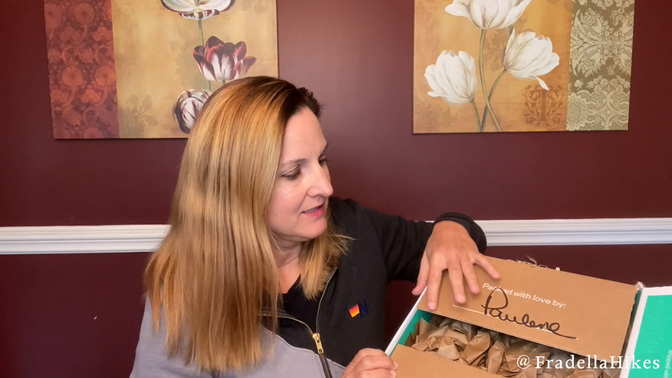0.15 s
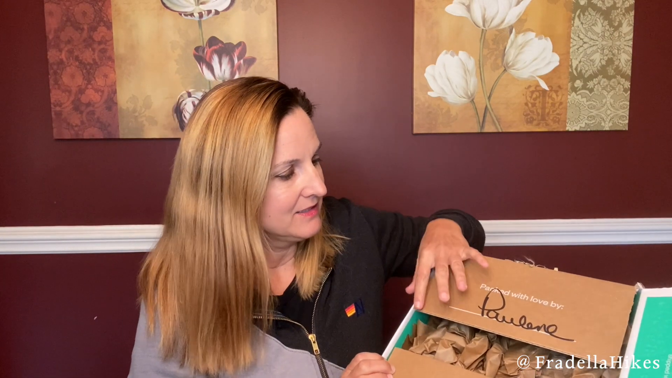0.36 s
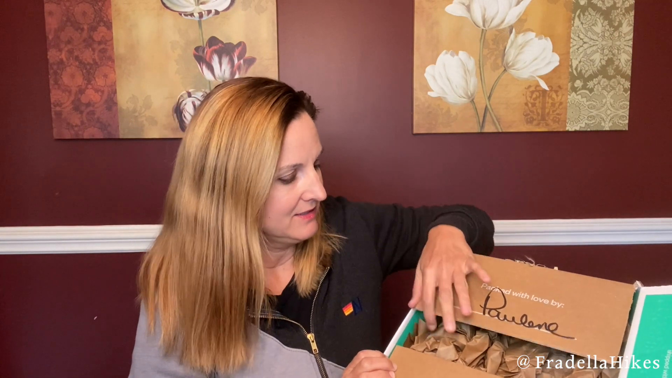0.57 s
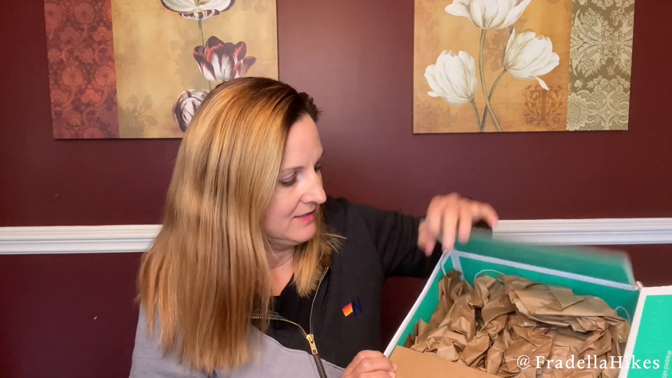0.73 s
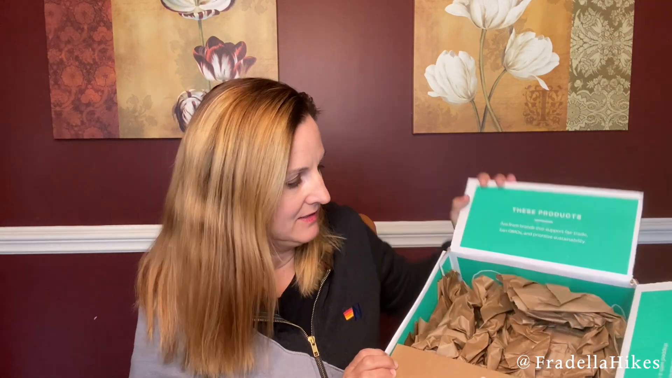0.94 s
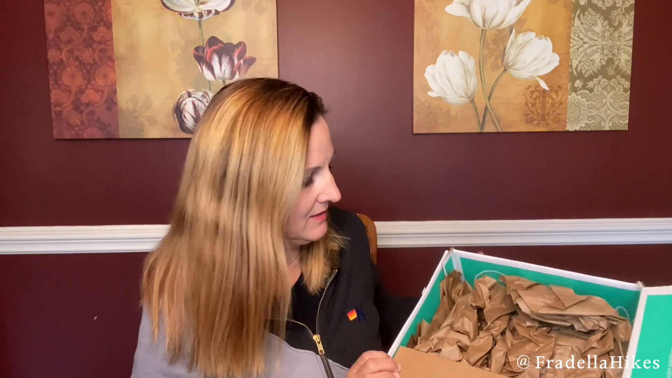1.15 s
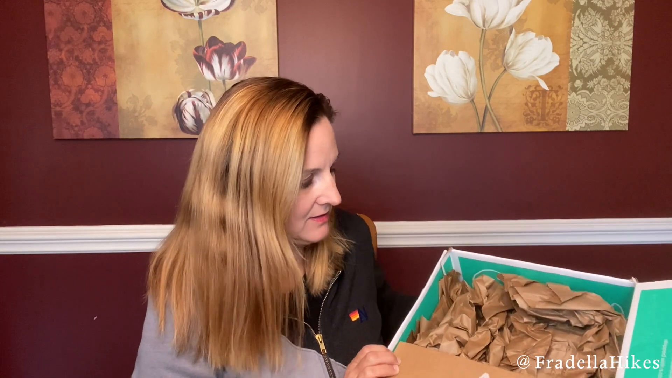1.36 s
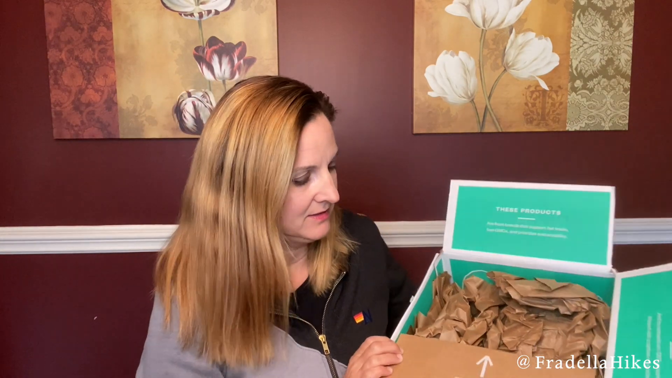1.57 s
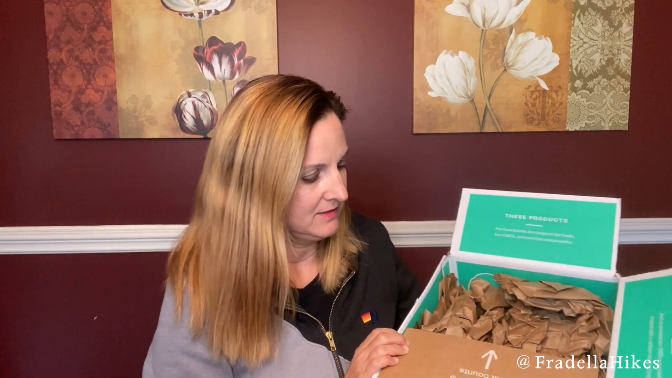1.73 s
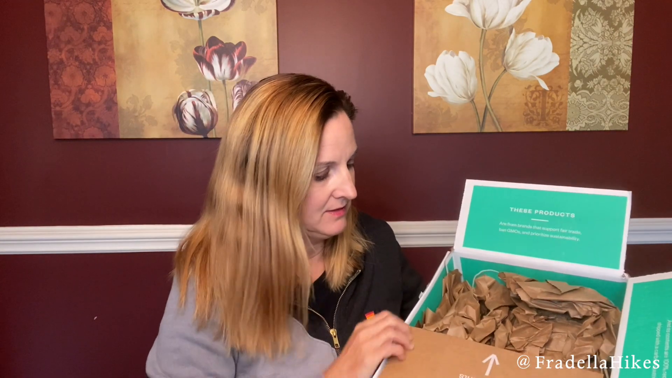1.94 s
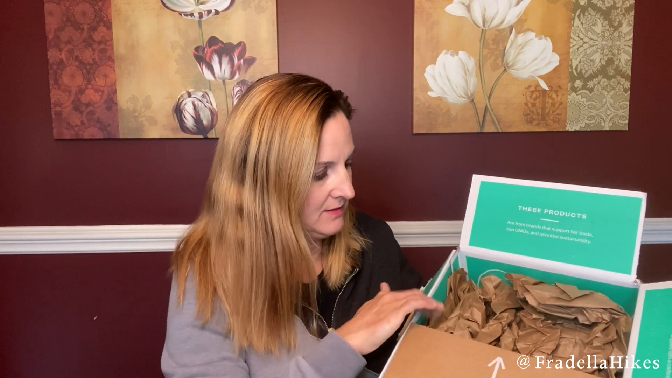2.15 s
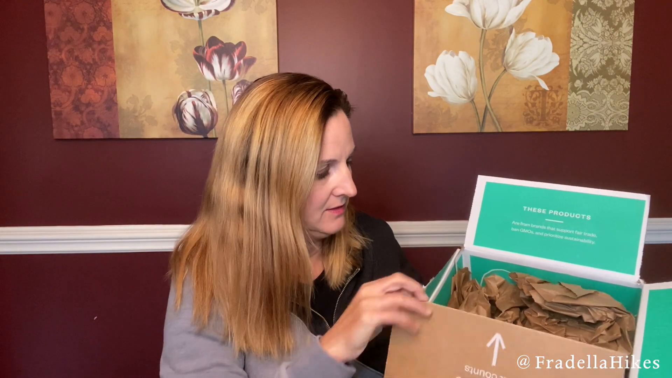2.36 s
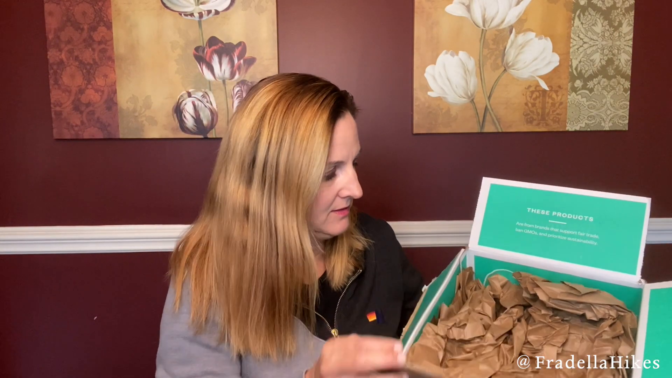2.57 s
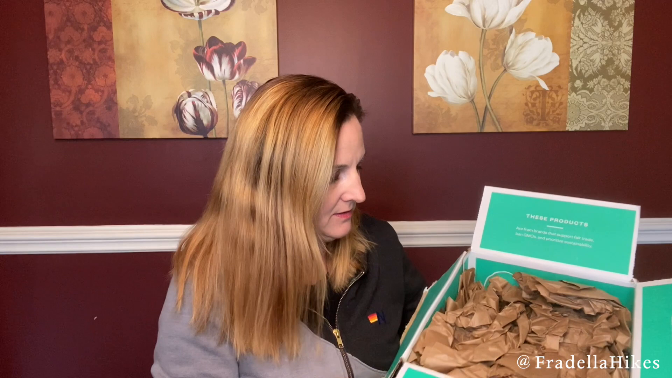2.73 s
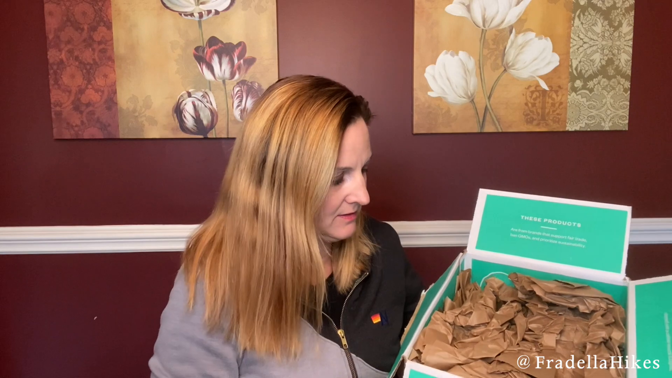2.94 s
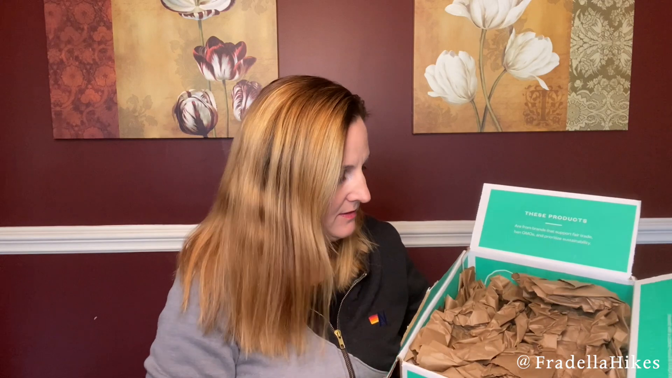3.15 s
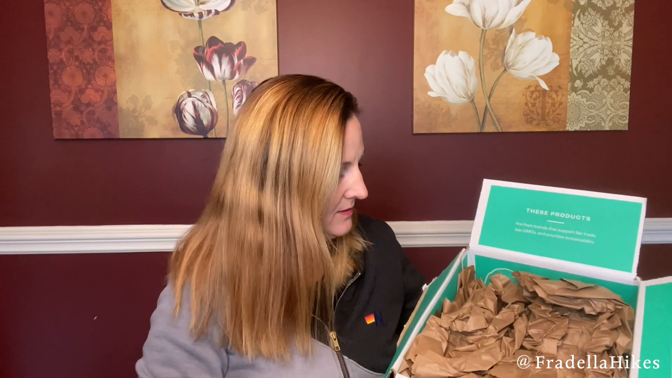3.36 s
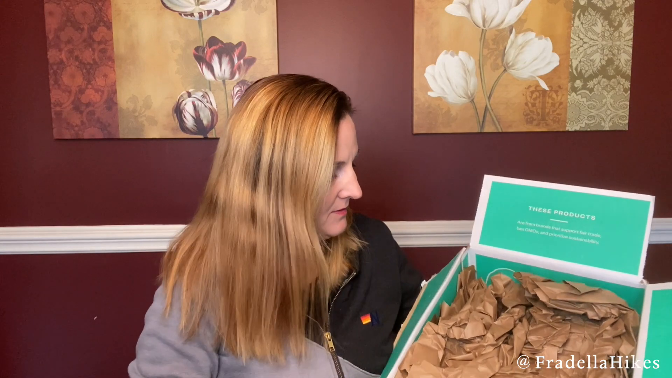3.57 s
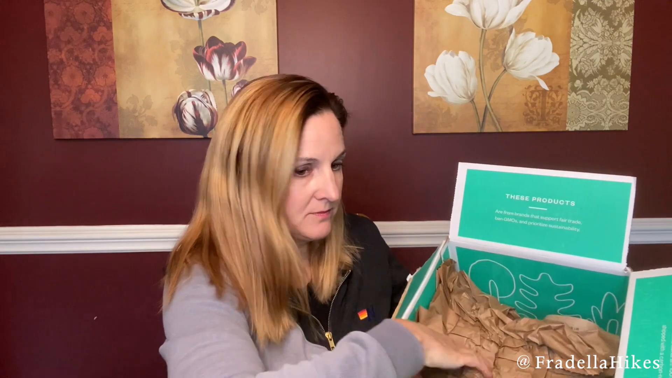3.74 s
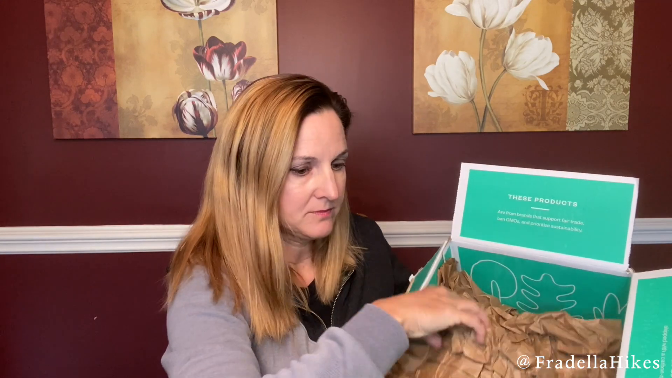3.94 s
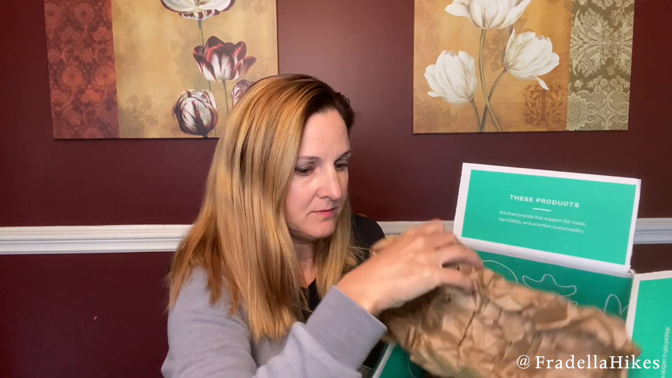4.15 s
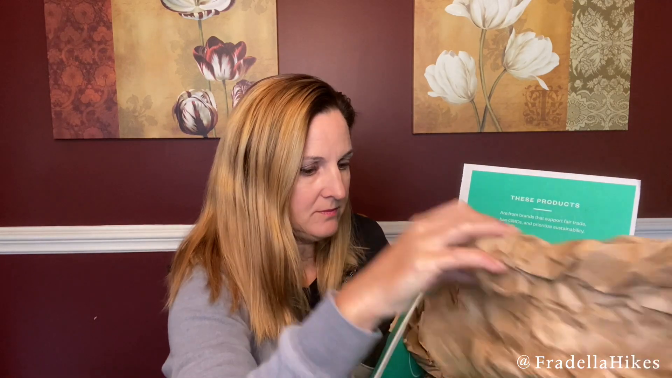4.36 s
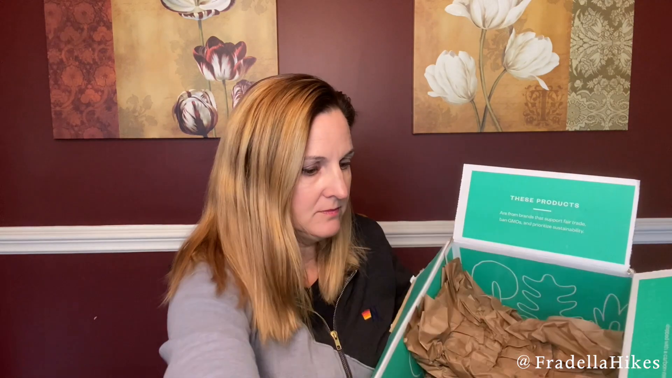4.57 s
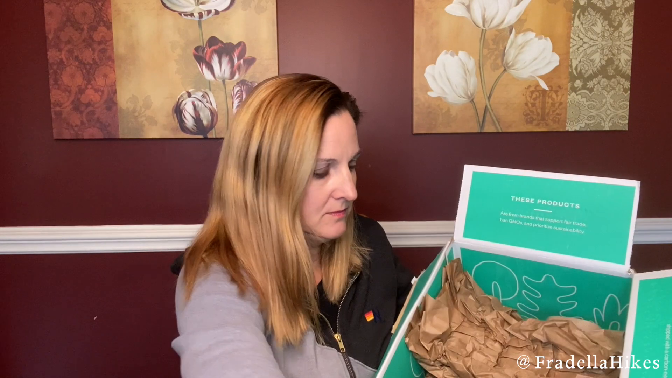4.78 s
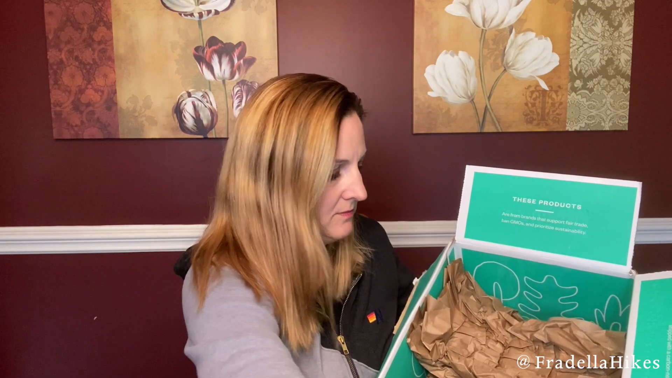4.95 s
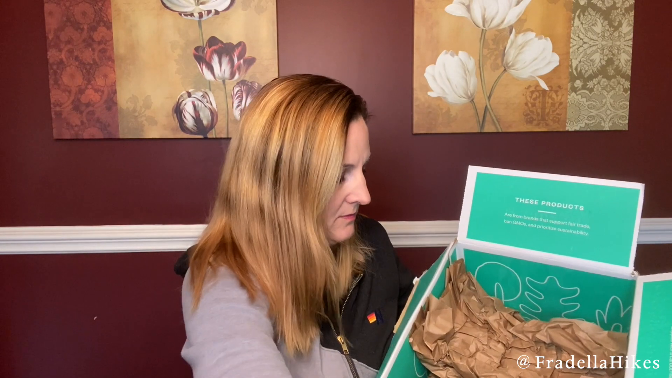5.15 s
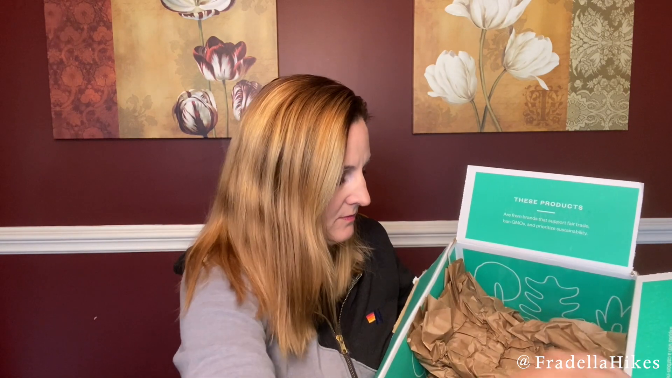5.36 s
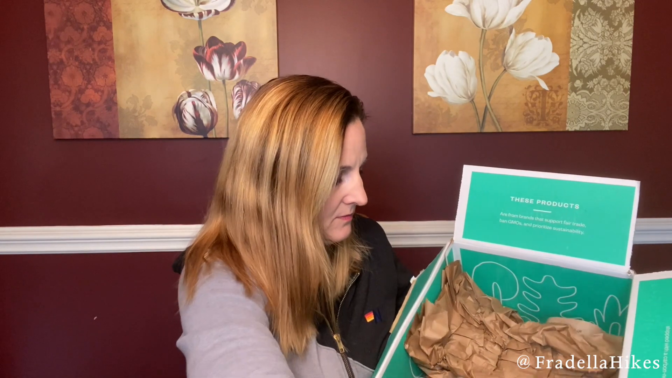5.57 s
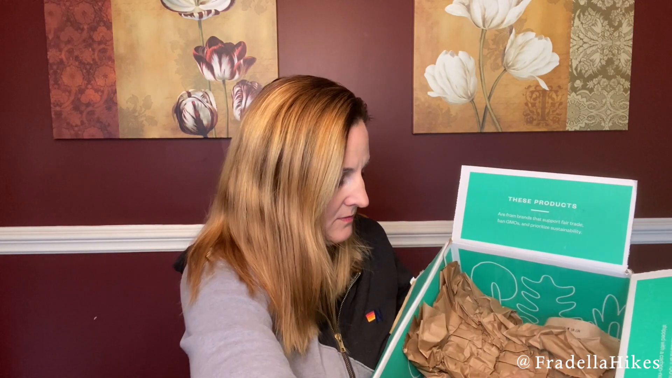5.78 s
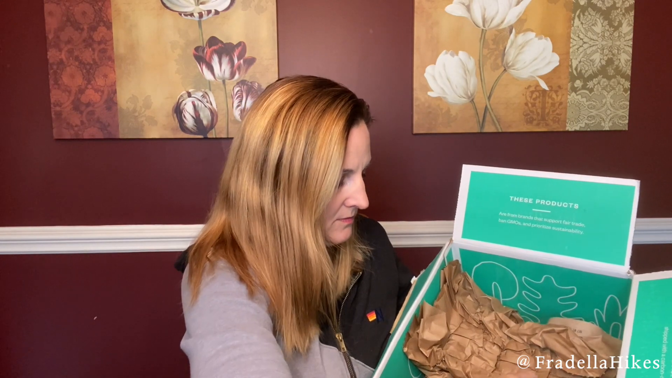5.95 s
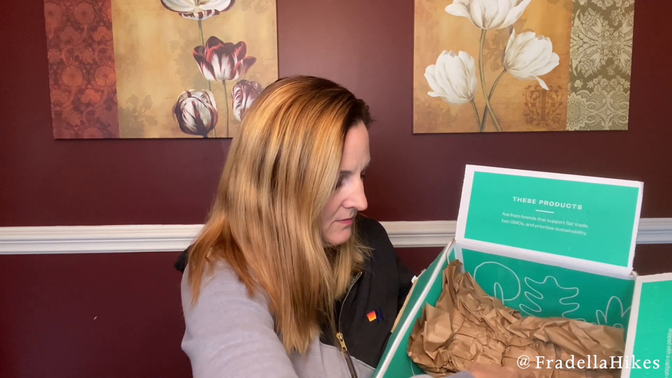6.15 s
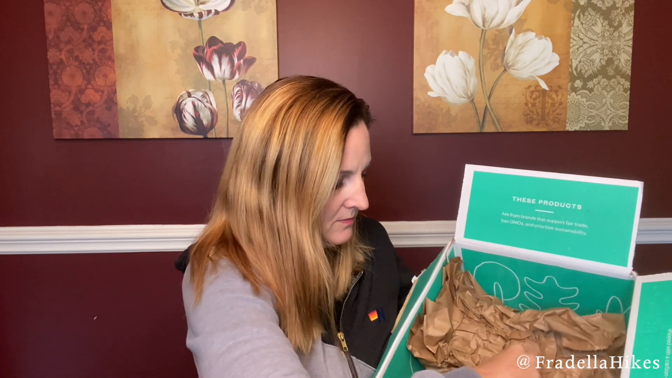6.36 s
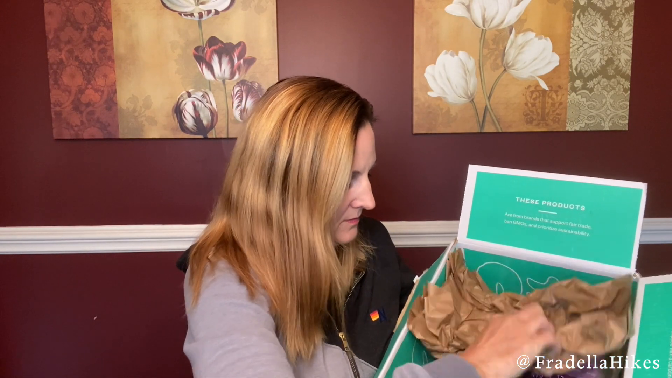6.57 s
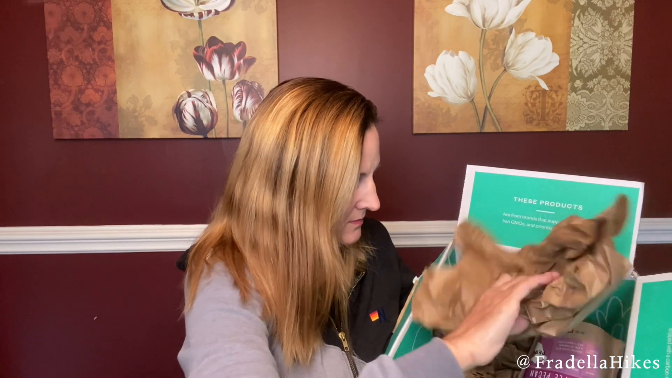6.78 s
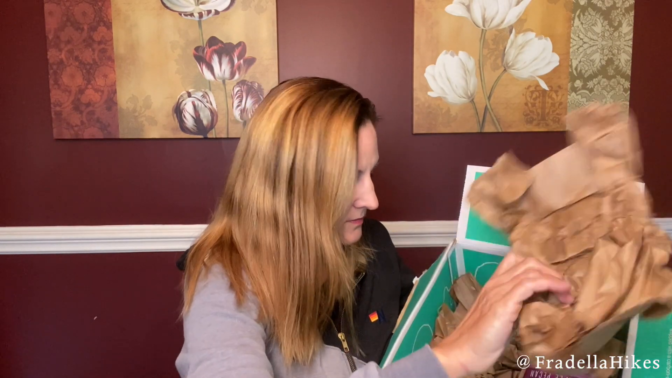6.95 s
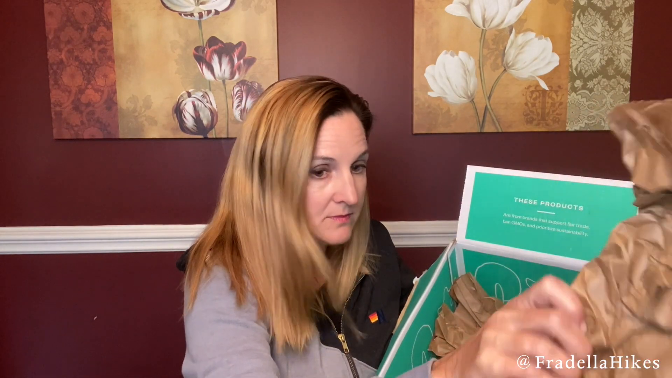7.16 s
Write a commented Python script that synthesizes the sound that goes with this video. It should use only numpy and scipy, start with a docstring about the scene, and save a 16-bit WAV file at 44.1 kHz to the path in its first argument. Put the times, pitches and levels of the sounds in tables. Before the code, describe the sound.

A cardboard box is opened with sharp knocks, flap scrapes and soft thuds, then crumpled packing paper crackles and rustles loudly in a small room.

```python
"""Small room, close mono microphone: a cardboard box is opened; flaps snap, knock and scrape, a sleeve slides.
Packing paper is then gripped, lifted out and dropped, and a second wad is worked loose.
Blows are air pushes, wall modes and board cracks; slides are random slips through resonances and spectra.
Paper is a swarm of ringing clicks with single loud snaps; low noise follows the movements.
A reverberant tail and quiet air noise complete the scene."""
import sys
import numpy as np
from scipy import signal
from scipy.fft import rfft, irfft
from scipy.io import wavfile
from scipy.ndimage import uniform_filter1d

SR = 44100
rng = np.random.default_rng(int(sys.argv[2]) if len(sys.argv) > 2 else 0)


def generate_wav(sig):
    """Save sig (samples, or channels by samples) to the path in sys.argv[1] as 16-bit PCM at SR."""
    pcm = np.round(np.clip(np.atleast_2d(sig).T, -1, 1) * 32767).astype(np.int16)
    wavfile.write(sys.argv[1], SR, pcm)


N = 318038
TIME_S = np.arange(N) / SR

# Blows on the box. Each row: start in seconds, air push in dB, wall ring in dB, crack in dB,
# crack decay in seconds, hardness as a tilt in dB per octave.
BLOWS = [(0.022, -58, -58, -48.5, 0.0043, -8), (0.04, -56, -50, -43.5, 0.0046, -7.5),
         (0.141, -39, -32, -31, 0.0011, 2.5), (0.1598, -55, -24.5, -11, 0.0021, -2),
         (0.84, -42, -40.5, -39.5, .006, 10), (1.144, -23.5, -31.5, -38, 0.0078, -7),
         (1.401, -31, -34, -34, 0.016, -4.5), (1.6012, -40, -13.5, -24, 0.02, -10.5),
         (1.692, -31, -25.5, -40, 0.0044, -9), (1.949, -57, -48, -35, 0.011, -0.5),
         (1.971, -48, -26.5, -29, 0.0076, 3), (1.986, -54, -25.5, -25, 0.004, 0),
         (2.113, -32.5, -45, -51, .004, 2), (2.208, -32, -38, -33, 0.0074, 1.5),
         (2.271, -34, -30.5, -27, .007, 3.5), (2.397, -31.5, -37, -37, 0.0025, -9.5),
         (2.779, -26.5, -31.5, -26.5, 0.0068, 4.5), (3.125, -26, -26, -28.5, 0.034, 0.5),
         (3.4523, -45, -37, -32.5, 0.015, 3), (3.871, -47, -23.5, -41, 0.0054, -3.5),
         (4.064, -21.5, -23, -48, .005, -15), (6.651, -45, -25, -29, 0.01, -3)]
# Modes of the box walls. Each row: nominal frequency in Hz, relative level in dB, t60 in seconds.
WALL_MODES = [(154.4, -3.5, 0.057), (226.6, -6.5, 0.13), (315.3, -1, 0.082), (372.5, 7, 0.059),
              (398, -1, 0.039), (606, -10, 0.15), (1220, -15.5, 0.16)]
# Resonances of the stiff board. Each row: frequency in Hz, width in Hz, relative level in dB.
BOARD_MODES = [(567, 910, 4), (830, 130, -9), (1560, 460, 3), (2900, 110, -23.5), (3800, 2740, 4.5),
               (5060, 120, 1.5), (5870, 920, -4.5), (8600, 670, 0.5), (11700, 4400, -5)]
# Strokes of hand or sleeve on the flaps. Each row: start in seconds, length in seconds, rise in seconds,
# board rub in dB, cloth hiss in dB, pushed air in dB.
STROKES = [(0.101, 0.11, 0.024, -55, -57.5, -62), (0.332, 0.087, 0.066, -64, -68.5, -68),
           (0.533, 0.053, 0.031, -56.5, -61, -46.5), (0.631, 0.016, 0.015, -55.5, -59.5, -50),
           (0.702, 0.1, 0.013, -61.5, -60.5, -61), (0.78, 0.12, 0.044, -54.5, -59.5, -53),
           (0.906, 0.29, 0.065, -51.5, -56, -57), (1.224, 0.16, 0.021, -66, -71, -55),
           (1.391, 0.026, 0.015, -48, -57.5, -52), (1.465, 0.22, 0.059, -61.5, -64, -68),
           (1.698, .11, 0.015, -53, -62.5, -60), (1.796, 0.24, 0.047, -54, -57.5, -70),
           (2.075, 0.083, 0.026, -58.5, -66, -54), (2.187, 0.071, 0.086, -42, -43, -52),
           (2.395, 0.089, 0.051, -51, -57, -51), (2.541, 0.093, .03, -57, -60.5, -58),
           (2.654, 0.18, 0.049, -47.5, -52, -50), (2.866, 0.23, 0.1, -53, -54.5, -56),
           (3.095, 0.029, 0.04, -37.5, -50, -47), (3.252, .14, 0.05, -53, -60.5, -63),
           (3.48, 0.14, 0.023, -58.5, -58.5, -70), (3.632, 0.096, .01, -61.5, -74, -64)]
# Front flap dragging as it is folded down. Each row: time in seconds, resonance in Hz, level in dB.
FLAP_DRAG = [(2.41, 1500, -90), (2.46, 1540, -58), (2.6, 1170, -109), (2.745, 950, -50), (2.87, 1030, -67),
             (2.98, 1100, -64), (3.2, 940, -73), (3.5, 1010, -82)]
# Squeezes, pulls and falls of the paper. Each row: start in seconds, length in seconds, rise in seconds,
# level in dB, extra treble in dB, pushed air in dB.
SQUEEZES = [(3.771, 0.17, 0.016, -34, -2, -45.5), (3.918, 0.07, 0.014, -33.5, 0.5, -48),
            (4.003, 0.068, 0.034, -30, -1, -46), (4.127, 0.066, 0.04, -44.5, 4, -64),
            (4.332, 0.21, 0.017, -56, -3, -59), (4.533, 0.11, 0.029, -46.5, -8, -52),
            (4.644, 0.078, 0.0097, -37.5, -3.5, -42), (4.769, 0.23, 0.021, -35.5, -4.5, -40),
            (5.053, 0.11, 0.042, -43.5, -3.5, -46), (5.498, 0.023, 0.0035, -42, 1.5, -56),
            (5.539, 0.035, 0.031, -36, 2.5, -46), (5.64, .06, 0.035, -45, -5, -60),
            (5.694, 0.12, .02, -38, -3, -53), (5.837, 0.061, .015, -43, -0.5, -48),
            (5.91, 0.097, 0.016, -46.5, -1.5, -60), (6.007, 0.048, 0.015, -38.5, -4, -63),
            (6.082, 0.12, 0.064, -38, 1, -55), (6.261, 0.098, .045, -36.5, -1, -53),
            (6.392, 0.098, 0.054, -35, 2.5, -48), (6.511, 0.066, 0.031, -39.5, 3.5, -55),
            (6.638, 0.075, 0.006, -37, 2.5, -48), (6.778, 0.14, 0.0087, -49, -1, -66),
            (6.907, 0.07, .025, -43.5, -6, -51.5), (6.975, 0.081, .01, -48.5, -4.5, -69),
            (7.053, 0.031, 0.038, -40, -5.5, -57), (7.186, 0.017, 0.014, -47, -6, -52)]
# Loudest buckling creases. Each row: start in seconds, level in dB, ring centre in Hz, decay in seconds.
CREASES = [(3.7753, -32, 1790, 0.0036), (3.799, -22.5, 2580, 0.0023), (3.824, -18, 4200, 0.0014),
           (3.87, -21, 1580, 0.0026), (3.9363, -21, 4500, 0.0011), (3.9422, -18, 4660, 0.0037),
           (4.012, -13.5, 2100, 0.0015), (4.025, -23, 3800, 0.0017), (4.052, -23, 2680, .004),
           (4.3779, -35.5, 1610, 0.0013), (4.4174, -33.5, 2900, 0.0017), (4.472, -39, 3800, 0.0033),
           (4.53, -39.5, 2470, 0.00068), (4.789, -21, 1730, 0.0026), (5.55, -29.5, 1700, 0.00085),
           (5.699, -24.5, 2340, 0.0016), (5.7433, -26, 3300, 0.00071), (5.754, -25.5, 2380, 0.0032),
           (5.8444, -24, 2480, 0.0079), (5.931, -28, 3930, .0047), (6.023, -28, 1290, 0.0028),
           (6.12, -27, 4100, 0.0057), (6.344, -27, 2440, 0.0013), (6.4385, -22.5, 4400, 0.0027),
           (6.647, -19.5, 2900, 0.0019), (6.7876, -24.5, 2880, 0.0031), (6.8754, -25, 3350, 0.0034),
           (6.9237, -28, 2900, 0.0066), (6.9445, -23.5, 4230, 0.007), (6.98, -25.5, 4600, 0.00022),
           (7.069, -33, 2020, .002), (7.094, -29, 2310, .003)]
# Spectra of paper, board rub, cloth hiss, low flutter and room air.
# Each row: frequency in Hz, relative density in dB per Hz.
PAPER_SPECTRUM = [(60, -14.5), (150, -2.5), (340, -0.5), (550, -3), (1000, -1), (1700, -1), (2500, -3.5),
                  (4800, -5), (6000, -7), (8000, -7.5), (11000, -14), (16000, -20.5)]
RUB_SPECTRUM = [(100, 0.5), (220, -1), (380, 2.5), (600, -3.5), (1200, -6), (3000, -11), (6000, -19.5),
                (16000, -67)]
CLOTH_SPECTRUM = [(500, -17), (2000, -4.5), (4000, 0.5), (8500, 5), (11000, 1.5), (13500, 0.5),
                  (16000, -4.5)]
RUMBLE_SPECTRUM = [(10, -49.5), (28, 5), (52, 7.5), (85, -3), (130, -10.5), (250, -20.5), (600, -63)]
AIR_SPECTRUM = [(15, -8), (55, -36.5), (130, -16), (350, -21), (2200, -34), (4000, -38), (16000, -50)]
# Room decay. Each row: frequency in Hz, t60 in seconds.
ROOM_T60 = [(100, 0.35), (1200, 0.46), (3700, 0.43), (8000, 0.29), (16000, 0.2)]
# Colour of the reflections. Each row: frequency in Hz, relative level in dB.
REFLECTION_COLOUR = [(100, -2), (400, 5.5), (1400, 3.5), (4000, 2.5), (8000, 2.5), (16000, 3.5)]

# Sag: easing during a movement. Stop and settle: dying away after it.
STROKE_SAG_DB_PER_S, STROKE_STOP_DB_PER_S = 8, 175
PAPER_SAG_DB_PER_S, PAPER_SETTLE_DB_PER_S, TREBLE_SETTLE_DB_PER_S = 12.5, 174, 203
FLUTTER_STOP_DB_PER_S, RESTING_RUMBLE_DB = 95.5, -64
SLIDING_SHARE, SLIDING_SHARE_PER_DB = 0.47, 0.12  # power share of smooth rubbing, growing with brightness
TREBLE_SPLIT_HZ, AIR_DB, EDGE_HZ = 4800, -66, 15900


def knocks(size=8192):
    """Each blow pushes air, rings the box walls and cracks the stiff board; soft blows favour low modes."""
    out = np.zeros(N)
    t_s = np.arange(size) / SR
    crack_low_cut = signal.butter(2, 300, "high", fs=SR, output="sos")
    for start_s, push_db, wall_db, crack_db, decay_s, tilt_db in BLOWS:
        push = np.sin(2 * np.pi * 80 * t_s) * np.exp(-t_s / 0.0082) * (1 - np.exp(-t_s / 0.0011))
        crack = signal.sosfilt(crack_low_cut, board_crack(t_s, decay_s, tilt_db))
        add(out, start_s, blow(push, push_db))
        add(out, start_s, blow(wall_ring(t_s, tilt_db), wall_db))
        add(out, start_s, blow(crack, crack_db))
    return out


def wall_ring(t_s, tilt_db):
    """Decaying panel modes, each retuned at random on every blow."""
    ring = np.zeros(len(t_s))
    for hz, db, t60_s in WALL_MODES:
        gain = gain_of(db + tilt_db * np.log2(hz) - 60 * t_s / t60_s)
        ring += gain * np.sin(2 * np.pi * hz * rng.uniform(0.88, 1.04) * t_s)
    return ring * (1 - np.exp(-t_s / .0012))


def board_crack(t_s, decay_s, tilt_db):
    """A run of slips drives damped board modes; a long blow is mostly scrape."""
    board = np.zeros(len(t_s))
    for k, (hz, width_hz, db) in enumerate(BOARD_MODES):
        gain = (-1) ** k * gain_of(db + tilt_db * np.log2(hz)) * width_hz  # alternate signs: one broad crack
        board += gain * np.exp(-np.pi * width_hz * t_s) * np.sin(2 * np.pi * hz * t_s)
    slips = burst(decay_s, rise_s=0.00031)
    slips[0] += 8  # one clean slip leads
    return signal.fftconvolve(slips, board)


def slide():
    """Stick and slip on the board sounds its hollow panels; cloth adds a fine hiss."""
    rub_db, hiss_db = np.transpose(STROKES)[3:5]
    rub_gain = effort(STROKES, rub_db, STROKE_SAG_DB_PER_S, STROKE_STOP_DB_PER_S)
    hiss_gain = effort(STROKES, hiss_db, STROKE_SAG_DB_PER_S, STROKE_STOP_DB_PER_S)
    drag_hz, drag_db = follow(FLAP_DRAG)
    slips = crackle(per_s=2500, spread_db=3.3, cap=4)
    rub = patchy(shaped(slips, RUB_SPECTRUM), patch_db=1.3, span_s=.04, span_hz=250)
    fibres = crackle(per_s=9000, spread_db=2.6, cap=5)
    hiss = patchy(shaped(fibres, CLOTH_SPECTRUM), patch_db=1.2, span_s=.04, span_hz=700)
    drag = resonate(slips, drag_hz, width_hz=910)
    drag = evened(resonate(drag, drag_hz, width_hz=910))
    return rub_gain * rub + hiss_gain * hiss + gain_of(drag_db) * drag


def rustle():
    """Facets buckle while sheets rub on each other; the brighter the movement, the smoother the sound."""
    level_db, treble_db = np.transpose(SQUEEZES)[3:5]
    body_gain = effort(SQUEEZES, level_db, PAPER_SAG_DB_PER_S, PAPER_SETTLE_DB_PER_S)
    treble_gain = effort(SQUEEZES, level_db + treble_db, PAPER_SAG_DB_PER_S, TREBLE_SETTLE_DB_PER_S)
    bright_db = 20 * np.log10((treble_gain + 1e-9) / (body_gain + 1e-9))
    sliding = np.clip(SLIDING_SHARE + SLIDING_SHARE_PER_DB * bright_db, .2, .85)
    rubbing = shaped(rng.standard_normal(N), PAPER_SPECTRUM)
    sheet = np.sqrt(1 - sliding) * evened(facet_grains()) + np.sqrt(sliding) * rubbing
    sheet = patchy(sheet, patch_db=1.7, span_s=.02, span_hz=500)
    body = signal.sosfiltfilt(signal.butter(1, TREBLE_SPLIT_HZ, fs=SR, output="sos"), sheet)
    return body_gain * body + treble_gain * (sheet - body)


def facet_grains(count=24):
    """Random clicks, each ringing one of a set of paper facets."""
    clicks = crackle(per_s=1900, spread_db=4.6, cap=4.2)
    which = rng.integers(0, count, N)
    grains = np.zeros(N)
    for k, hz in enumerate(np.geomspace(800, 12000, count)):
        response = causal(facet_db(hz, lift_db=9, octaves=.3))
        ring = signal.fftconvolve(response, burst(decay_s=.0006, rise_s=.0002, size=256))
        grains += signal.oaconvolve(clicks * (which == k), blow(ring, 0))[:N]
    return grains


def snaps():
    """Single creases strain, give way and ring their patch of paper; small patches are brighter all over."""
    out = np.zeros(N)
    for start_s, db, hz, decay_s in CREASES:
        tilt_db = 7.6 * np.log2(hz / 3200) * np.log2(1 + bins_hz() / 4000)
        # waves bounce between the patch edges: a random overtone spacing for each patch
        overtones_db = 5 * np.cos(2 * np.pi * (bins_hz() - hz) / rng.uniform(1800, 3800))
        ring = causal(facet_db(hz, lift_db=6.5, octaves=1.0) + tilt_db + overtones_db)
        snap = signal.fftconvolve(burst(decay_s, rise_s=.0005), ring)
        add(out, start_s, blow(snap, db))
        strain = burst(decay_s=.003, rise_s=.0004, size=512)[::-1]  # swells up to the snap
        add(out, start_s - len(strain) / SR, blow(signal.fftconvolve(strain, ring), db - 18))
    return out


def rumble():
    """Every stroke and squeeze moves a panel or sheet, pushing air in a soft low flutter over a steady floor."""
    moves = STROKES + SQUEEZES
    pushed_db = [row[-1] for row in moves]
    pushed_gain = effort(moves, pushed_db, STROKE_SAG_DB_PER_S, FLUTTER_STOP_DB_PER_S)
    flutter = shaped(rng.standard_normal(N), RUMBLE_SPECTRUM)
    return np.hypot(pushed_gain, gain_of(RESTING_RUMBLE_DB)) * flutter


def room(x, wet_db, build_s, count=3):
    """Wall reflections, each band dying at its own speed; slow weights vary the mix of random tails."""
    t_s = np.arange(SR // 2) / SR
    out = x.copy()
    for k in range(count):
        echoes = rng.standard_normal(len(t_s)) * (rng.random(len(t_s)) < 3000 / SR)
        taps = echoes * (1 - np.exp(-t_s / build_s))
        hz, frame_s, z = signal.stft(taps, SR, nperseg=256)
        colour_db = read(REFLECTION_COLOUR, hz)[:, None]
        decay_db = 60 * frame_s / read(ROOM_T60, hz)[:, None]
        tail = signal.istft(z * gain_of(colour_db - decay_db), SR)[1]
        share = np.sqrt(2 / count) * np.cos(np.pi * (TIME_S + k / count))  # squares sum to 1
        out += gain_of(wet_db) * signal.fftconvolve(x * share, tail / np.linalg.norm(tail))[:N]
    return out


def room_air():
    """Steady noise with the spectrum of the quiet room."""
    return gain_of(AIR_DB) * shaped(rng.standard_normal(N), AIR_SPECTRUM)


def effort(rows, levels_db, sag_db_per_s, stop_db_per_s):
    """Gain of a run of movements: each swells, eases off while it lasts, then dies away; powers add."""
    power = np.zeros(N)
    t_s = np.arange(SR) / SR
    for (start_s, length_s, rise_s, *_), db in zip(rows, levels_db):
        fall_db = sag_db_per_s * np.minimum(t_s, length_s) + stop_db_per_s * np.maximum(t_s - length_s, 0)
        add(power, start_s, (np.minimum(t_s / rise_s, 1) * gain_of(db - fall_db)) ** 2)
    return np.sqrt(power)


def burst(decay_s, rise_s, size=4096):
    """A quick run of tiny slips: noise that rises and dies away exponentially."""
    t_s = np.arange(size) / SR
    return rng.standard_normal(size) * (1 - np.exp(-t_s / rise_s)) * np.exp(-t_s / max(decay_s, 1 / SR))


def crackle(per_s, spread_db, cap):
    """Random clicks of either sign, most small and a few large."""
    size = gain_of(spread_db * np.minimum(rng.exponential(1, N), cap))
    return size * rng.choice([-1, 1], N) * (rng.random(N) < per_s / SR)


def facet_db(hz, lift_db, octaves):
    """Gain of one stiff patch of paper: the paper's colour with a hump where the patch rings."""
    distance = np.log2((bins_hz() + 1) / hz) / octaves
    return read(PAPER_SPECTRUM, bins_hz()) + lift_db * np.exp(-.5 * distance ** 2)


def patchy(x, patch_db, span_s, span_hz, size=512):
    """Resonances come and go in random patches of time and frequency."""
    z = signal.stft(x, SR, nperseg=size)[2]
    field = rng.standard_normal(z.shape)
    for _ in range(2):
        field = uniform_filter1d(field, max(1, round(span_hz * size / SR)), axis=0)
        field = uniform_filter1d(field, max(1, round(span_s * 2 * SR / size)), axis=1)
    return evened(signal.istft(z * gain_of(patch_db * evened(field)), SR)[1][:N])


def resonate(x, hz, width_hz):
    """A resonance that follows a frequency curve: shift to zero, smooth, shift back."""
    turn = np.exp(2j * np.pi * np.cumsum(hz) / SR)
    r = np.exp(-np.pi * width_hz / SR)
    return 2 * (turn * signal.lfilter([1 - r], [1, -r], x / turn)).real


def causal(db):
    """Minimum-phase, hence sharp-fronted, impulse response with this gain."""
    log_gain = np.log(gain_of(np.maximum(db, -100)))
    mirrored = np.r_[log_gain, log_gain[-2:0:-1]]
    return np.fft.ifft(np.exp(np.conj(signal.hilbert(mirrored)))).real


def shaped(x, spectrum):
    """A steady sound given a spectrum, at rms 1."""
    gain = gain_of(read(spectrum, np.fft.rfftfreq(N, 1 / SR)))
    return evened(irfft(rfft(x) * gain, N))


def bins_hz(size=1024):
    """Frequencies on which short responses are drawn."""
    return np.fft.rfftfreq(size, 1 / SR)


def read(points, hz):
    """A frequency table interpolated on a log-frequency axis."""
    table_hz, value = np.transpose(points)
    return np.interp(np.log(hz + 1), np.log(table_hz + 1), value)


def follow(rows):
    """The columns of a curve table at every sample."""
    s, *columns = np.transpose(rows)
    return [np.interp(TIME_S, s, column) for column in columns]


def gain_of(db):
    """Decibels to an amplitude factor."""
    return 10 ** (np.asarray(db) / 20)


def evened(x):
    """Scaled to rms 1."""
    return x / np.sqrt(np.mean(x ** 2) + 1e-20)


def blow(x, db):
    """A short sound scaled to the energy of one millisecond at this rms level."""
    return gain_of(db) * x * np.sqrt(SR / 1000 / (np.sum(x ** 2) + 1e-20))


def add(mix, start_s, sound):
    """Mixes a sound in at a time, cut at the end of the mix."""
    part = mix[max(0, round(start_s * SR)):][:len(sound)]
    part += sound[:len(part)]


def scene():
    """Box and paper in the room, over rumble and quiet air; both channels carry the one microphone."""
    box = room(knocks() + slide(), wet_db=-12, build_s=0.0015)
    paper = room(rustle() + snaps(), wet_db=-11, build_s=.004)
    return np.tile(box + paper + rumble() + room_air(), (2, 1))


def record(dry):
    """The recorder's band limit: a linear-phase low-pass."""
    low_pass = signal.firwin(301, EDGE_HZ, window=("kaiser", 8), fs=SR)
    return signal.oaconvolve(dry, low_pass[None], "same")


dry = scene()
out = record(dry)
generate_wav(out)
```